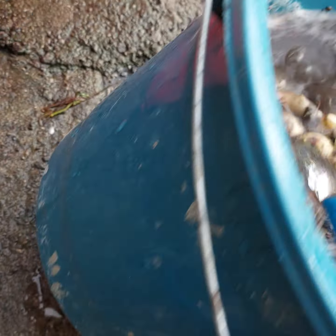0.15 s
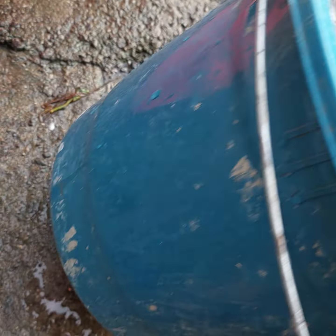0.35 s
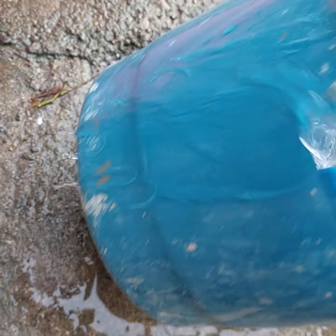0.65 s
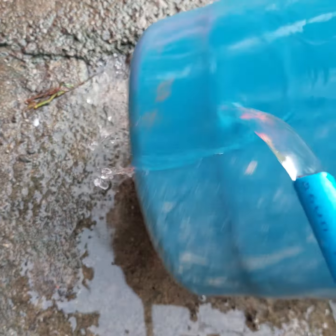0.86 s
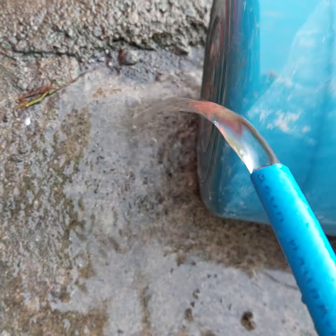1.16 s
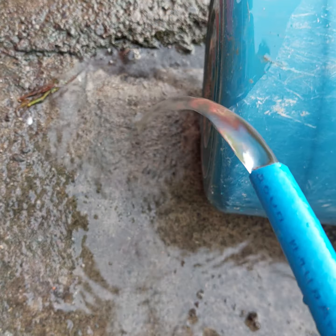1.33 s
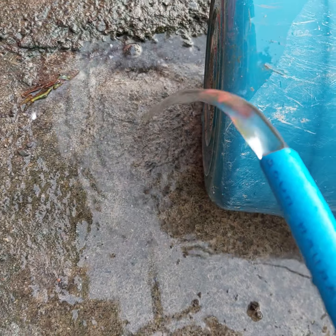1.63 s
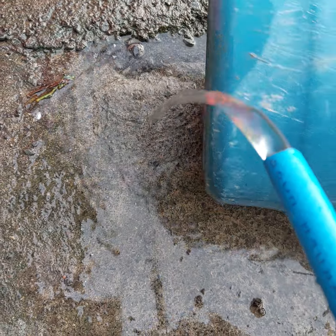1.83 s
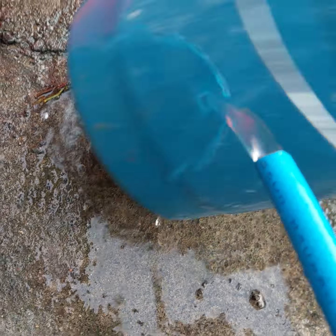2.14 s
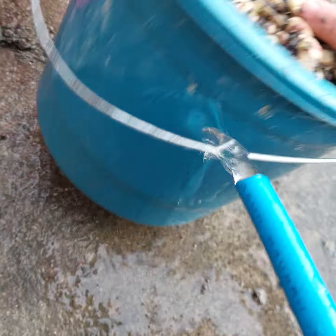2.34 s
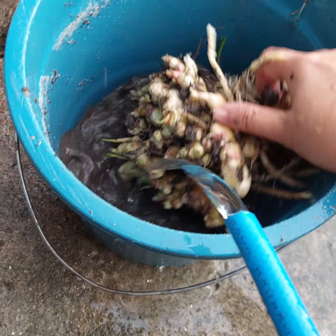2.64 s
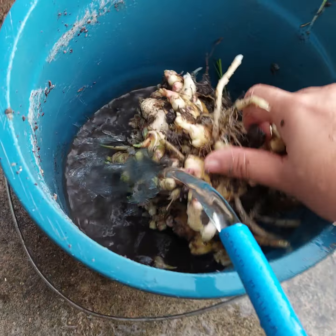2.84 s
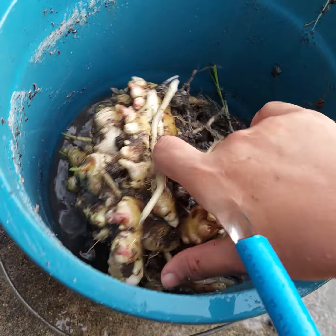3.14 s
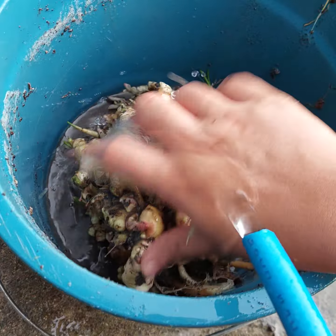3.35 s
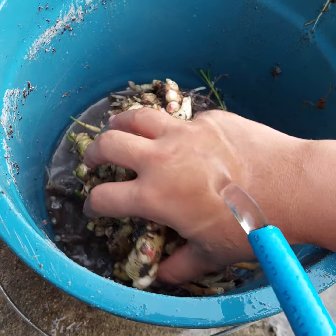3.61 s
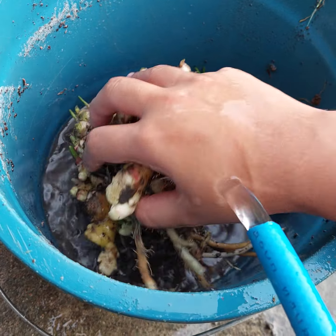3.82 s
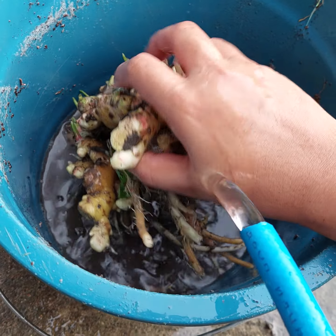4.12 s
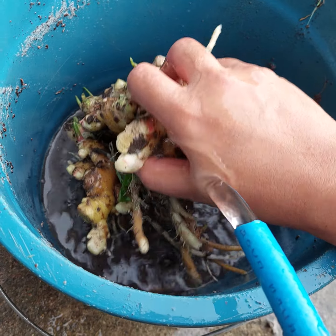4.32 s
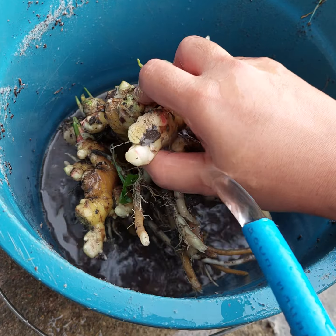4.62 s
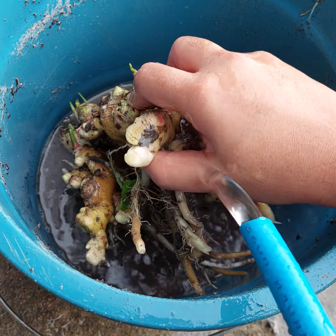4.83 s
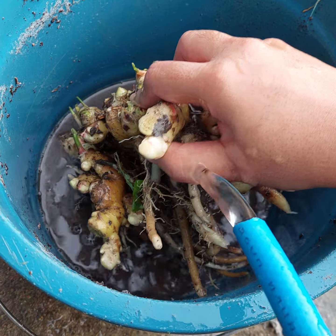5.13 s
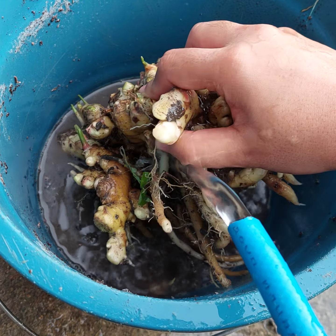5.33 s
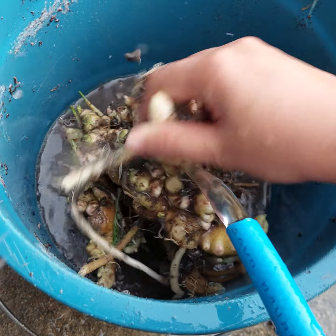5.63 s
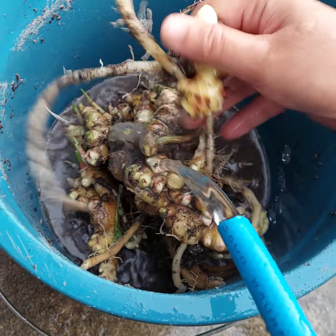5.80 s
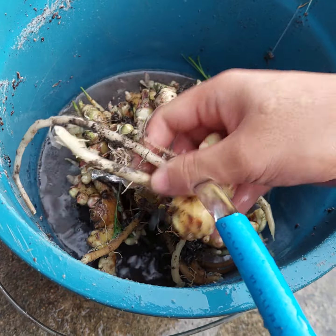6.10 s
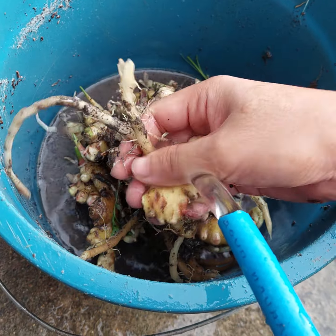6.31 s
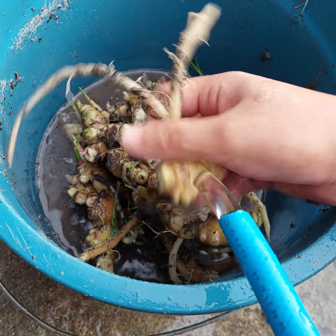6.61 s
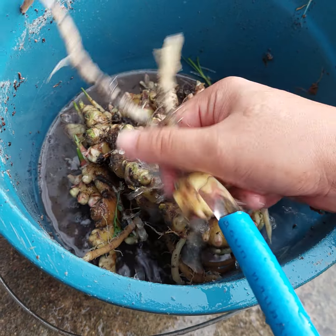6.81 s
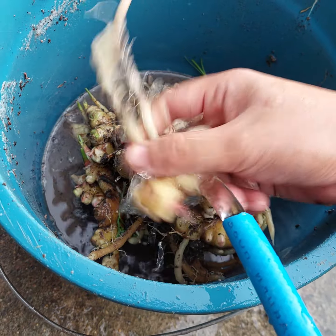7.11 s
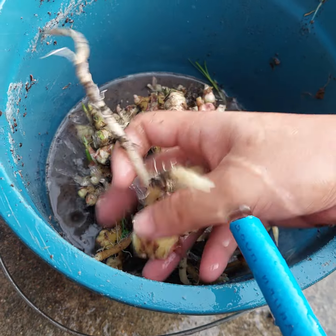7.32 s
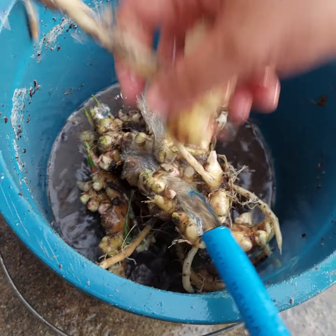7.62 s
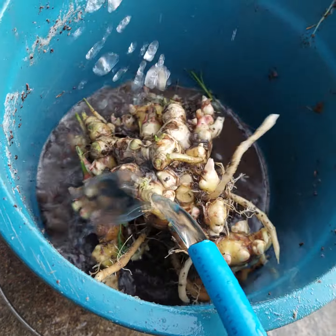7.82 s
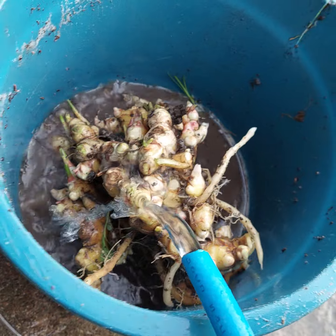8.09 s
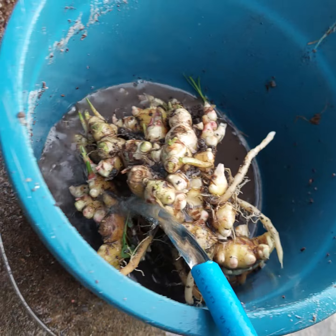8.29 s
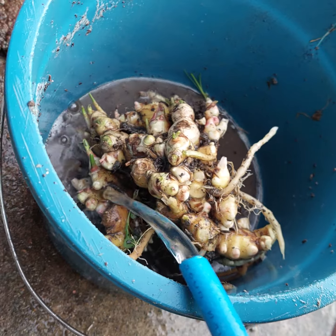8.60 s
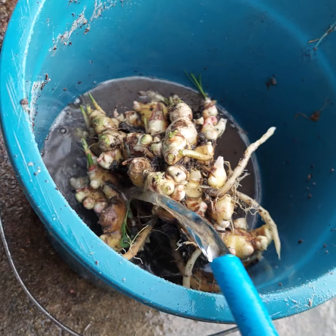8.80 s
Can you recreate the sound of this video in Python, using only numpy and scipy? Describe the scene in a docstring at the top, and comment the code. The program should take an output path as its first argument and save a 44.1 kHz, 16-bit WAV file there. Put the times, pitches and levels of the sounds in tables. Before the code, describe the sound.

A hollow plastic bucket thuds through heavy splashes, then quiets to small drops, soft wet swishes and a cracking root over a low hum.

```python
"""A garden hose runs while a plastic bucket is tipped out on concrete, set upright, and roots are rubbed in it.
First come splashes, drops and booming knocks; large surges follow near 1.2 and 2.6 s, then the water weakens
to bubbles, drips and spits. A root snaps at 5.5 s; small drops and soft swishes go on to the end.
A wavering hum, far rumble and insect hiss last throughout, and a far bird chirps three times.
Water is shaped noise and damped bubble tones; hits ring decaying modes; two spaced microphones give the width."""
import sys
import numpy as np
from scipy import signal
from scipy.fft import rfft, irfft, next_fast_len
from scipy.io import wavfile
from scipy.ndimage import uniform_filter1d, map_coordinates

SR = 44100
rng = np.random.default_rng(int(sys.argv[2]) if len(sys.argv) > 2 else 0)


def waveform_to_disk(signal):
    """Save audio, clipped to [-1, 1], as 16-bit WAV at the path in sys.argv[1]."""
    frames = np.transpose(np.atleast_2d(signal))
    scaled = np.clip(frames, -1, 1) * 32767
    samples = np.round(scaled).astype(np.int16)
    wavfile.write(sys.argv[1], SR, samples)


N = 394694
T = np.arange(N) / SR
LAG_S = 0.0002  # arrival difference: running noise is later on the left, grains on average later on the right


def amp(db):
    """Level to amplitude: 20 dB is a factor of ten."""
    return 10 ** (np.asarray(db) / 20)


def unit(x):
    """Normalization: scaled to rms 1."""
    return x / np.sqrt(np.mean(x ** 2) + 1e-20)


def mix(noise, grain, share):
    """Power addition: independent signals, the second with this share of the power."""
    share = np.clip(share, 0, 1)
    return np.sqrt(1 - share) * noise + np.sqrt(share) * grain


def along(points, hz):
    """Logarithmic frequency scale: (frequency [Hz], value) points joined by lines."""
    f, v = np.transpose(points)
    return np.interp(np.log(hz + 1), np.log(f + 1), v)


def curves(rows):
    """Envelopes: one value per sample for each column after the time."""
    s, *columns = np.transpose(rows)
    return [np.interp(T, s, column) for column in columns]


def wobble(rate):
    """Slow random modulation: a smooth curve through rate random knots a second."""
    knots = rng.standard_normal(int(N * rate / SR) + 4)
    return map_coordinates(knots, [T * rate])


def filtered(x, response):
    """Linear filtering: the spectrum times a response of frequency."""
    m = next_fast_len(N + 8192)
    return irfft(rfft(x, m) * response(np.fft.rfftfreq(m, 1 / SR)), m)[..., :N]


def coloured(points):
    """Spectral density: the response of (frequency [Hz], relative level [dB]) points."""
    return lambda hz: amp(along(points, hz))


def resonant(peaks):
    """Resonance: the sum of second-order band-passes, each passed twice for steeper skirts."""
    def response(f):
        return sum(amp(db) * (1j * f * w / (c * c - f * f + 1j * f * w)) ** 2 for c, w, db in peaks)
    return response


# Likeness of the two microphones in a diffuse field: (frequency [Hz], left-right correlation [0-1])
COHERENCE = [(60, 0.86), (130, .96), (300, 0.89), (640, 0.32), (1300, 0.22), (3000, 0.071), (8000, 0.12)]


def rush(response):
    """Diffuse-field coherence: stereo noise of rms 1, alike in the bass and nearly unrelated in the treble."""
    def turn(hz):
        return np.arccos(np.clip(along(COHERENCE, hz), -1, 1)) / 2

    def mid_side(hz):
        return response(hz) * [np.cos(turn(hz)), np.sin(turn(hz))]

    mid, side = filtered(rng.standard_normal((2, N)), mid_side)
    left = np.roll(mid + side, round(LAG_S * SR))
    return unit(np.array([left, mid - side]))


def patchy(x, depth_db):
    """Turbulent modulation: short patches of the spectrum swell and sink at random."""
    z = signal.stft(x, nperseg=256)[2]
    field = rng.standard_normal(z.shape[1:])
    field = uniform_filter1d(field, size=4, axis=0)  # over frequency
    field = uniform_filter1d(field, size=7, axis=1)  # over time
    return unit(signal.istft(z * amp(depth_db * unit(field)), nperseg=256)[1][:, :N])


def pings(s, gain, hz, t60, pan_db, lag_s, rise, soft, size):
    """Damped oscillation: sines swell over soft cycles and decay; the left one comes lag_s after the right."""
    out = np.zeros((2, N + size + 99))
    t = np.arange(size) / SR
    cycles = hz[:, None] * t
    decay = t / t60[:, None]
    # the phase bends by rise, so the pitch gains twice that share of itself over t60
    wave = np.sin(2 * np.pi * cycles * (1 + rise * decay))
    wave = wave * amp(-60 * decay) * (1 - np.exp(-cycles / soft))
    for ear, sign in enumerate((1, -1)):
        start = np.clip(np.round((s + sign * lag_s / 2) * SR).astype(int), 0, N)
        weights = wave * (gain * amp(sign * pan_db / 2))[:, None]
        places = start[:, None] + np.arange(size)
        out[ear] = np.bincount(places.ravel(), weights.ravel(), out.shape[1])
    return out[:, :N]


BUNCH, BUNCH_S = 8, 0.02  # grains in a bunch; mean delay within it, s
BUNCH_SHARE, BUNCH_SCATTER_DB = 0.405, 1.5  # shared part of the pitch variance; level from bunch to bunch
LIFE_SCATTER = 0.73  # log spread of ring length


def grains(count, hz, spread, cycles, scatter_db, size):
    """Bubble acoustics: short rings in bunches that share a place and, in part, a pitch; rms 1."""
    u, g = rng.random((count, 3)), rng.standard_normal((count, 6))
    lead = np.arange(count) // BUNCH * BUNCH  # first grain of each bunch
    s = u[lead, 0] * N / SR - BUNCH_S * np.log(u[:, 2] + 1e-3)
    pitch = np.clip(hz * np.exp(spread * mix(g[:, 0], g[lead, 3], BUNCH_SHARE)), 200, 15500)
    life = cycles * np.exp(LIFE_SCATTER * g[:, 4]) / pitch
    gain = amp(-scatter_db * np.log(u[:, 1] + 0.02) + BUNCH_SCATTER_DB * g[lead, 5])
    pan_db = 3 * g[lead, 1]
    lag = 0.00006 * g[lead, 2] - LAG_S
    return unit(pings(s, gain, pitch, life, pan_db, lag, rise=0.1, soft=0.5, size=size))


# Background levels: (time [s], rumble [dB], insects [dB])
YARD_LEVELS = [(0.0, -46, -54), (0.3, -49.5, -53.5), (1.22, -43.5, -50), (1.94, -50, -53.5),
               (3.01, -44.5, -52.5), (4.39, -48, -57), (8.95, -45, -55)]
# Hum: (time [s], pitch [Hz], level [dB])
HUM_PATH = [(0.0, 141.8, -45), (0.55, 136.5, -41.5), (2.42, 135.6, -42), (2.52, 135.3, -63),
            (2.64, 125.4, -43), (2.72, 134.3, -47), (4.21, 130.7, -47.5), (4.49, 134, -50),
            (6.25, 131.6, -48), (6.53, 141.8, -47), (7.83, 136.7, -47.5), (8.47, 133, -39.5),
            (8.67, 142.6, -47), (8.95, 136.9, -44)]
# Noisy halo round the hum: (frequency [Hz], width [Hz], relative level [dB])
HALO_PEAKS = [(133.6, 13.3, 1), (212.7, 8.2, -8.5)]
# Fainter wandering drone: (time [s], pitch [Hz], peak level [dB])
DRONE_PATH = [(0, 165, -62), (3.9, 168, -63), (5.1, 160, -49), (6.1, 160, -50), (7.5, 148.4, -53),
              (8.1, 163.4, -54), (8.95, 168, -53)]
# Far rumble: (frequency [Hz], relative level per Hz [dB])
RUMBLE_SPECTRUM = [(16, -50), (28, -20), (54, -1.5), (97, -4), (139, -0.5), (190, -11), (280, -14),
                   (325, -21), (700, -42), (910, -79), (1540, -120)]
# Insect bands: (frequency [Hz], width [Hz], relative level [dB])
INSECT_BANDS = [(7230, 400, 6.5), (8790, 690, 5.5), (10220, 1100, 4)]
# Faint hiss: (frequency [Hz], relative level per Hz [dB])
HISS_SPECTRUM = [(350, -42), (600, -24.5), (982, -7), (1820, 8), (3460, -36), (5140, 1), (6320, -14),
                 (10200, 8.5), (15900, -30)]


def yard():
    """Tones and band noise: a wavering hum with a noisy halo, a drone, far rumble, insects and faint hiss."""
    rumble_db, insect_db = curves(YARD_LEVELS)
    hz, hum_db = curves(HUM_PATH)
    tone = np.sqrt(2) * np.sin(2 * np.pi * np.cumsum(hz + 0.95 * wobble(9)) / SR)
    hum = amp(hum_db + 1.4 * wobble(9.1)) * mix(rush(resonant(HALO_PEAKS)), tone, share=0.8)
    drone_hz, drone_db = curves(DRONE_PATH)
    drone_level = amp(drone_db + 2.6 * wobble(7))
    drone = drone_level * np.sin(2 * np.pi * np.cumsum(drone_hz + 1.503 * wobble(11)) / SR)
    rumble = amp(rumble_db) * rush(coloured(RUMBLE_SPECTRUM))
    insects = amp(insect_db + [[1.5], [-1.5]]) * rush(resonant(INSECT_BANDS))  # stronger on the left
    hiss = amp(-60.5) * rush(coloured(HISS_SPECTRUM))
    return hum + drone + rumble + insects + hiss


# Calls of a small bird far off: (time [s], level [dB])
CALLS = [(2.501, -44.5), (5.915, -49.5), (8.878, -48.5)]
# Course of one call: (time [s], pitch [Hz], relative level [dB])
CALL_SHAPE = [(0, 5100, -3), (0.023, 4390, 6), (0.059, 3900, 3.5), (.09, 3660, -6)]


def bird():
    """Frequency modulation and reverberation: a falling chirp flutters in pitch, and the yard smears it."""
    s, hz, db = np.transpose(CALL_SHAPE)
    t = np.arange(round(s[-1] * SR)) / SR
    pitch = np.interp(t, s, hz) + 550 * np.sin(2 * np.pi * 170 * t)
    call = amp(np.interp(t, s, db)) * np.sin(2 * np.pi * np.cumsum(pitch) / SR)
    out = np.zeros((2, N + SR))
    for start, level in CALLS:
        tail = rng.standard_normal((2, 6000)) * amp(-60 * np.arange(6000) / SR / 0.11)  # t60 0.11 s
        heard = signal.fftconvolve(call[None], tail / np.linalg.norm(tail[0]), axes=1)
        out[:, round(start * SR):][:, :heard.shape[1]] += amp(level) * heard
    return out[:, :N]


# Wet swishes and a low slosh: (time [s], half length to 1/e [s], centre frequency [Hz], level [dB])
SWISHES = [(2.332, 0.1, 2540, -45.5), (4.02, 0.16, 209, -43.5), (6.896, 0.045, 3470, -48),
           (7.161, 0.048, 2650, -47), (7.502, 0.087, 2340, -49.5)]


def swishes():
    """Flow noise: water slides over skin and roots or round the bucket in soft swells of band noise."""
    out = 0
    for s, half, hz, db in SWISHES:
        level = amp(db + 3.8 * wobble(110) + 4.2 * wobble(300))
        swell = np.exp(-((T - s) / half) ** 2)
        out = out + level * swell * rush(resonant([(hz, 0.59 * hz, 0)]))
    return out


# Large bubbles: (time [s], level [dB], first pitch [Hz])
BIG_BUBBLES = [(1.194, -13.5, 615), (1.298, -9.5, 397), (0.61, -29, 645), (1.398, -17, 700),
               (1.9, -42, 800), (1.969, -24, 535)]
GLUG_CYCLES, GLUG_RISE = 19, 2.1  # t60 in cycles of the first pitch; phase bend over it


def glugs():
    """Bubble resonance: trapped air escapes as large bubbles that swell and climb in pitch."""
    s, db, hz = np.transpose(BIG_BUBBLES)
    return pings(s, amp(db), hz, GLUG_CYCLES / hz, -3, -0.00025, rise=GLUG_RISE, soft=1.5, size=5000)


# Knocks and glugs in the bucket: (time [s], level of the strongest tone [dB], its pitch [Hz])
BUCKET_KNOCKS = [(0.191, -12.5, 594), (0.192, -18.5, 274), (0.55, -24.5, 265), (0.552, -26, 560),
                 (0.651, -14, 587), (0.676, -28, 262), (0.736, -25.5, 635), (0.749, -25, 614),
                 (0.784, -34, 422.5), (1.037, -28, 430), (1.103, -19.5, 445), (1.228, -9, 374),
                 (1.245, -10, 386), (1.37, -15, 319), (1.469, -17, 346), (1.525, -19, 327),
                 (1.574, -24, 381), (1.594, -21, 400), (1.616, -21, 352), (1.62, -20, 606),
                 (1.655, -24, 363), (1.69, -26, 403), (2.57, -27, 350), (2.599, -17, 375),
                 (2.623, -14.5, 397), (2.636, -7.5, 359), (2.645, -5, 356), (2.776, -24, 378),
                 (2.9, -15, 348), (3.01, -26.5, 350), (3.038, -23, 340), (3.068, -18.5, 370),
                 (3.178, -21.5, 355), (3.317, -20, 339), (3.496, -20, 330), (5.5177, -13, 366),
                 (5.595, -31, 373), (5.695, -29, 382), (7.975, -31, 359), (8.397, -27, 800)]
# Modes of the bucket: (frequency [Hz], relative level [dB], t60 [s])
BUCKET_MODES = [(60.3, 0.4, 0.089), (109, -4.5, 0.064), (175, 1.5, 0.058), (241, 1, 0.05),
                (350, -0.5, 0.071), (402, 3, 0.049), (548, -5.5, 0.078), (904, -8.5, 0.032),
                (1136, -9, 0.078)]
MODES_DB, MODE_SCATTER_DB = -15, 4  # modes relative to the strongest tone; change from knock to knock


def knocks():
    """Modal excitation: every knock rings its own tone and the bucket's modes at new strengths and pitches."""
    s, db, hz = np.transpose(BUCKET_KNOCKS)
    g = rng.standard_normal((len(s), len(BUCKET_MODES)))
    pan_db = -hz / 120  # higher tones lean to the right
    out = pings(s, amp(db), hz, 20 / hz, pan_db, -0.00017, rise=0.022, soft=1.0, size=5000)
    for k, (mode, level, t60) in enumerate(BUCKET_MODES):
        gain = amp(db + MODES_DB + level + MODE_SCATTER_DB * g[:, k])
        pitch = mode * (1 + 0.077 * g[:, k - 1])
        decay_s = np.full_like(s, t60)
        out += pings(s, gain, pitch, decay_s, pan_db, -0.000075, rise=0, soft=0.54, size=5000)
    return out


# Modes of the breaking root: (frequency [Hz], relative level [dB], t60 [s])
ROOT_MODES = [(1160, 4, 0.021), (2090, -3, 0.015), (2850, -16, 0.0088), (3720, 1, 0.013), (4200, 6, 0.0072),
              (5180, 2, 0.0066), (6050, -4, 0.0099), (7570, -17, 0.0073)]
SNAP_S, SNAP_DB = 5.5166, -8.5
SNAP_PAN_DB = 11.5  # left minus right, for the burst and for modes from 4 kHz up
TEAR_DB, TEAR_T60_S = -20, 0.025


def snap():
    """Fracture: a root breaks, its modes ring for milliseconds and its fibres tear with a burst of noise."""
    hz, db, t60 = np.transpose(ROOT_MODES)
    s = SNAP_S + 0.00043 * rng.random(len(hz))
    pan_db = SNAP_PAN_DB * np.clip(hz / 4000, 0, 1)
    ring = pings(s, amp(SNAP_DB + db), hz, t60, pan_db, -0.0004, rise=0, soft=0.57, size=1500)
    side = SNAP_PAN_DB * np.c_[[0.5, -0.5]]
    burst = amp(TEAR_DB + side - 60 * np.abs(T - SNAP_S) / TEAR_T60_S) * (T > SNAP_S)
    return ring + burst * rush(lambda hz: hz / (hz + 900) / (1 + (hz / 6000) ** 2))


# Drops and snaps: (time [s], level [dB], pitch [Hz], treble relative to level [dB], left minus right [dB])
DROP_HITS = [(0.1483, -26, 1350, -13, 6), (0.19, -18, 1285, -26, 1), (0.443, -30.5, 2040, -24.5, -3),
             (0.5034, -29.5, 3900, -6.5, 3.5), (0.536, -23.5, 1160, -20, -8), (0.5568, -18, 1350, -15, 0),
             (0.618, -24, 1550, -11, 0), (0.65, -18, 1290, -29, 0), (0.6773, -18, 975, -31, -2),
             (0.678, -30, 1700, -28, -6), (0.9433, -31, 3600, -23, 4), (1.034, -21.5, 2960, -21, -1.5),
             (1.1055, -16, 2440, -14, -1.5), (1.131, -15.5, 1830, -29, 9), (1.149, -10, 1860, -14.5, -1),
             (1.22, -9.5, 1210, -28, 3), (1.293, -24, 1910, -29, 2), (1.329, -21, 1700, -25, -6),
             (1.387, -27, 2400, -28, -2), (1.452, -19, 2130, -25, -3), (1.617, -22, 1900, -27, -0.5),
             (1.763, -18.5, 1360, -29, 4.5), (1.9651, -26, 1910, -17, -3), (2.011, -20, 1800, -33, 0.5),
             (2.291, -21, 2870, -15, -5.5), (2.389, -26, 1760, -20, -3), (2.6213, -10.5, 905, -26, 0),
             (2.6297, -12.5, 1230, -15.5, 3), (2.67, -22, 1280, -14.5, -0.5), (2.899, -29, 1250, -22, -1),
             (3.041, -19.5, 1324, -19, 8.5), (3.306, -21, 1270, -16.5, 4), (3.198, -27.5, 1397, -26, 2),
             (3.3277, -24.5, 1800, -25, -4.5), (3.497, -20, 1750, -32, -0.5), (3.5497, -31, 1790, -27, -2),
             (3.786, -24, 2180, -20, 6), (3.888, -25, 2350, -31, 5), (4.2886, -30.5, 1280, -19, 2),
             (4.4754, -38, 4960, -10, 8), (4.5648, -29.5, 2390, -16, 0), (4.6346, -33.5, 1970, -21, -3),
             (4.868, -31, 2057, -25, 0.5), (4.9875, -37, 4430, -9.5, 3), (5.4232, -31.5, 2130, -20, 6.5),
             (5.559, -28, 3166, -14, 4), (5.576, -23, 3020, -20, 2), (5.5894, -19.5, 1810, -15.5, 1),
             (5.612, -25.5, 1780, -20, 0), (5.618, -31.5, 2890, -12, 5.5), (5.644, -29, 1800, -29, -7),
             (5.658, -28, 1740, -26, -3), (5.698, -35, 1210, -24, 0), (5.757, -36, 3755, -12, 3.5),
             (5.8622, -33, 4290, -21, 9.5), (5.9332, -25.5, 1790, -31, 2), (5.978, -33, 2000, -19, -0.5),
             (6.506, -33, 5660, -18, 5), (6.522, -25.5, 1090, -26, 0), (6.781, -35, 2880, -16, 5),
             (6.808, -32.5, 1587, -18, 6), (6.8488, -33, 2500, -16, 7.5), (6.9694, -38.5, 4890, -25, 4.5),
             (7.116, -36, 3103, -20, 0), (7.263, -44, 1700, -20, -3), (7.302, -38.5, 1110, -21, 3),
             (7.44, -32, 3900, -18, 3), (7.4605, -33.5, 4400, -8, 2), (7.536, -30.5, 1740, -5, 4.5),
             (7.5739, -31, 1850, -14, 3), (7.6755, -30.5, 1470, -10, 5), (7.702, -28.5, 1200, -19, 5),
             (7.725, -30, 1507, -22, 3), (7.94, -26, 2040, -15, 4), (7.9752, -21.5, 1300, -23, 0.5),
             (7.999, -37.5, 1983, 9.5, 6.5), (8.043, -31, 4280, -18, 9), (8.071, -19, 1454, -13, 6),
             (8.1349, -40, 2800, -4.5, 8), (8.165, -31.5, 1840, -25, 1.5), (8.213, -39.5, 2546, -20, 6),
             (8.303, -40, 2500, -16, 7), (8.325, -33, 885, -5, 6), (8.3655, -29.5, 4310, -15, 6),
             (8.367, -31, 1463, -20, 3.5), (8.3939, -23.5, 880, -17, 4.5), (8.406, -36, 995, 3, 7),
             (8.412, -32, 1650, -20, 2), (8.6933, -32.5, 2210, -14, 8)]
# Dry crack: (frequency [Hz], relative level per Hz [dB])
CRACK_SPECTRUM = [(410, -37), (700, -5), (2130, 3.5), (2590, -2), (5190, -4.5), (9730, -17.5), (14600, -31),
                  (16000, -37)]


def drops():
    """Impact acoustics: a ping, partials, a crack and a bright tick; hard hits crack more and ring less."""
    s, db, hz, treble_db, pan_db = np.transpose(DROP_HITS)
    lag = -0.00003 * pan_db - 0.0001
    hard = np.clip((db + 16.5) / 20, 0, 1)
    t60 = 0.019 * (1 - 1.1 * hard)
    out = pings(s, amp(db), hz, t60, pan_db, lag, rise=0.021, soft=1.04, size=2500)
    g = rng.standard_normal((len(s), 6))
    for k in range(6):
        partial = np.clip(hz * np.exp(0.5 * g[:, k]), 500, 8000)
        gain = amp(db - 10.5 + 9 * hard - 1.8 * k)
        out += pings(s + 0.0006 * k, gain, partial, 0.78 * t60, pan_db, lag, rise=0.032, soft=0.52, size=1200)
    cracks, ticks = np.zeros((2, 2, N + 900))
    t = np.arange(900) / SR
    swell = np.minimum(t / 0.0032, 1) ** 2
    crack_fall = -60 * np.maximum(t - 0.005, 0) / 0.026
    tick_fall = -60 * np.maximum(t - 0.006, 0) / 0.014
    for start, level, bright, pan in zip(s - 0.002, db - 15 + 10 * hard, db + treble_db + 3, pan_db):
        side = np.c_[[pan / 2, -pan / 2]]
        place = slice(round(start * SR), round(start * SR) + 900)
        cracks[:, place] += swell * amp(level + side + crack_fall)
        ticks[:, place] += swell * amp(bright + side + tick_fall)
    noise = mix(rng.standard_normal((2, N)), rng.standard_normal(N), share=0.29)
    noise = unit(filtered(noise, coloured(CRACK_SPECTRUM)))
    fizz = rush(resonant([(11700, 11700, 0)]))
    hits = out + cracks[:, :N] * noise + ticks[:, :N] * fizz
    return np.roll(hits, round(0.0007 * SR), axis=1)  # the peak follows the first touch


def splatter(x, level_db, t60, alike):
    """Reverberation: a hit throws up water and echoes inside the bucket as a short, dull, noisy tail."""
    tail = mix(rng.standard_normal((2, 4000)), rng.standard_normal(4000), alike)
    tail = tail * amp(-60 * np.arange(4000) / SR / t60)
    dull = filtered(x, lambda hz: 1 / (1 + (hz / 5000) ** 2))
    return x + amp(level_db) * signal.fftconvolve(dull, tail / np.linalg.norm(tail[0]), axes=1)[:, :N]


# Sudden gushes on top of the flow: (time [s], splash [dB], spray [dB], t60 [s])
SURGES = [(0.179, -42, -48, 0.36), (1.217, -11.5, -46, 0.1), (2.62, -27, -47, 0.24), (3.05, -44, -56, 0.43),
          (3.299, -30, -46, 0.28), (3.49, -40, -64, 0.36), (3.53, -35, -60, 0.32), (3.864, -36, -44.5, 1.3),
          (4.619, -48, -62, 0.42), (4.861, -50.5, -49, 0.45), (5.525, -37.5, -40, 0.73),
          (5.58, -42, -65, 1.44), (5.92, -41.5, -68, 0.38), (6.46, -49, -52, 0.53), (6.5, -43, -52, 0.21),
          (6.701, -45.5, -55, 0.79), (7.45, -49, -51, 0.67), (7.959, -47, -47, 1.4), (8.36, -56, -44, 0.26)]
GUSH_RISE_S = 0.0079


def gushed(flow_db, gush_db):
    """Energy summation: gushes that rise fast and die away add their power to a level curve."""
    power = amp(2 * flow_db)
    for (s, *_, t60), db in zip(SURGES, gush_db):
        t = np.maximum(T - s, 0)
        power = power + amp(2 * (db - 60 * t / t60)) * np.minimum(t / GUSH_RISE_S, 1) ** 2
    return 10 * np.log10(power)


# Running water: (time [s], splash [dB], spray [dB])
FLOW_LEVELS = [(0.0, -53, -49.5), (0.41, -52, -64.5), (0.45, -41.5, -40), (0.65, -37, -41),
               (0.87, -49.5, -42), (1.05, -40, -37.5), (1.22, -27, -35), (1.47, -28, -39.5),
               (1.89, -35, -43.5), (2.14, -41.5, -46.5), (2.54, -46.5, -52), (2.75, -45, -48),
               (3.21, -40, -52), (3.4, -49.5, -57.5), (3.71, -54.5, -58.5), (4.46, -61.5, -59),
               (5.38, -61, -54), (6.11, -75, -59), (6.55, -55, -57.5), (7.53, -60, -55), (8.27, -52, -56),
               (8.95, -55, -59.5)]
# Water sloshing in the bucket: (time [s], level [dB])
SLOSH_LEVEL = [(0.0, -65), (0.4, -58.5), (0.65, -48), (0.9, -54), (1.25, -38), (1.47, -32.5), (1.89, -53),
               (2.14, -59), (2.54, -48.5), (2.66, -26.5), (2.72, -45), (3.3, -44.5), (3.71, -56.5),
               (4.06, -48), (4.46, -57.5), (5.45, -63), (5.61, -43.5), (6.11, -60), (6.6, -56), (7.9, -60),
               (8.3, -49.5), (8.95, -68)]
# Air in the bucket: (frequency [Hz], width [Hz], relative level [dB])
AIR_MODES = [(340, 56, 0), (383, 69, -2.5)]
# Spectra of splash, spray and fine spit: (frequency [Hz], relative level per Hz [dB])
SPLASH_SPECTRUM = [(260, -63), (450, 4), (879, -2), (1080, -9), (1360, 0), (1760, -4), (1920, -3.5),
                   (3500, -11), (4550, -20), (7700, -120)]
SPRAY_SPECTRUM = [(1470, -18), (2500, -1.5), (3650, -2), (5130, -3.5), (7870, -13), (11000, -27),
                  (14300, -35), (22000, -120)]
SPIT_SPECTRUM = [(5290, -16), (9000, -5.5), (12500, -1), (15900, -8), (17000, -53)]
# Wall resonances under the splash: (frequency [Hz], width [Hz], relative level [dB])
WALL_MODES = [(940, 135, -1), (1350, 150, -1.5), (1904, 280, 5.5), (2270, 260, 4), (2770, 350, 2.5)]
# Balance of the water at the two microphones: (frequency [Hz], left minus right [dB])
WATER_LEAN = [(300, -2), (650, -4), (1300, -1.5), (4400, 3.5), (8000, 12), (15000, -0.5)]
SPIT_DB, SPIT_GROWS = -55, 0.8  # fine spit at a spray of -51 dB; dB gained for each dB of spray


def water():
    """Turbulence and bubbles: a strong flow is a dense wash, a weak one breaks into gulps and bright drips."""
    _, *gush_db, _ = np.transpose(SURGES)
    splash_db, spray_db = map(gushed, curves(FLOW_LEVELS), gush_db)
    spit_db = SPIT_DB + SPIT_GROWS * (spray_db + 51)
    boom_db, = curves(SLOSH_LEVEL)
    weak = np.clip((-33 - uniform_filter1d(splash_db, size=6000)) / 18, 0, 1)
    gulp = (0.4 + 0.9 * weak) * wobble(28)

    bubbles = grains(count=6400, hz=1452, spread=0.5, cycles=19.6, scatter_db=3.5, size=1200)
    drips = grains(count=3200, hz=2033, spread=0.401, cycles=21, scatter_db=4.5, size=1500)
    droplets = grains(count=4000, hz=4320, spread=0.395, cycles=18.4, scatter_db=4.5, size=400)
    spits = grains(count=2500, hz=13000, spread=0.27, cycles=5, scatter_db=3, size=60)
    spits = unit(filtered(spits, coloured(SPIT_SPECTRUM)))

    wash = patchy(rush(coloured(SPLASH_SPECTRUM)), depth_db=2.5)
    wash = mix(wash, bubbles, share=0.3 + 0.22 * weak)
    wash = mix(wash, drips, share=0.53 * weak)
    walled = unit(filtered(wash, lambda hz: 1 + np.abs(resonant(WALL_MODES)(hz))))
    splash = amp(splash_db + 1.47 * gulp) * walled

    mist = patchy(rush(coloured(SPRAY_SPECTRUM)), depth_db=1.8)
    mist = mix(mist, droplets, share=0.21 + 0.5 * weak)
    spray = amp(spray_db + 1.2 * gulp + 3.1 * weak * wobble(24)) * mist

    fine = mix(rush(coloured(SPIT_SPECTRUM)), spits, share=0.12 + 0.5 * weak)
    spit = amp(spit_db + 2.7 * gulp + 1.9 * weak * wobble(70)) * fine

    # sloshing excites the air in the bucket
    boom = amp(boom_db + 3.3 * wobble(30) - 3.8 * weak) * rush(resonant(AIR_MODES))
    return filtered(splash + spray + spit + boom, lambda hz: amp(np.outer([0.5, -0.5], along(WATER_LEAN, hz))))


def scene():
    """Superposition: the sound pressures of all sources add."""
    background = yard() + bird()
    bucket = swishes() + glugs() + splatter(knocks(), level_db=-8.5, t60=0.13, alike=0.85)
    root = splatter(snap(), level_db=-20, t60=0.052, alike=0.1)
    hits = splatter(drops(), level_db=-4, t60=0.096, alike=0.17)
    return background + bucket + root + hits + water()


CLIP, TOP_HZ = 0.95, 15900  # ceiling of the rounded peaks (full scale 1); band limit


def record(dry):
    """Band limiting and saturation: deep bass is dropped, loud peaks are rounded, the top is cut off."""
    x = filtered(dry, lambda hz: 1 / (1 + (40 / (hz + 1)) ** 4))
    rounded = x / (1 + (x / CLIP) ** 6) ** (1 / 6)
    return filtered(rounded, lambda hz: hz < TOP_HZ)


dry = scene()
out = record(dry)
waveform_to_disk(out)
```